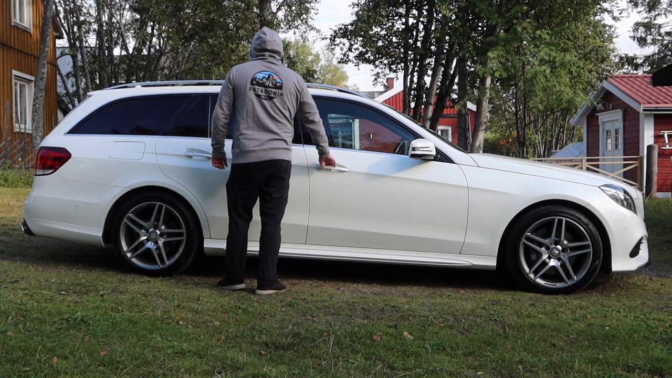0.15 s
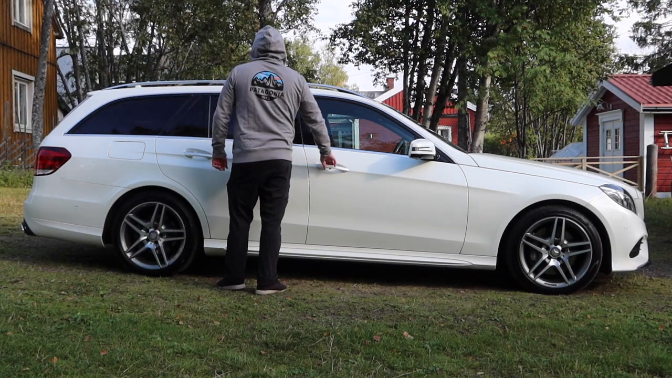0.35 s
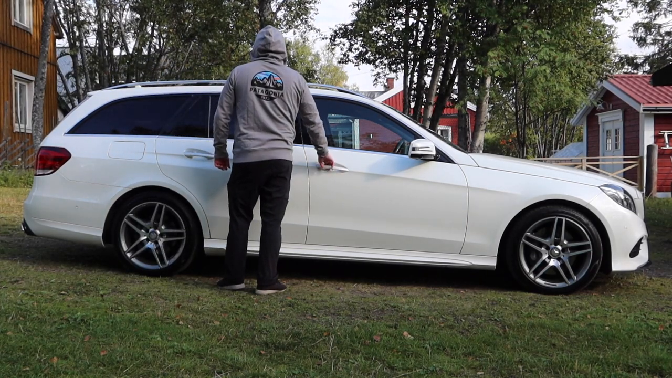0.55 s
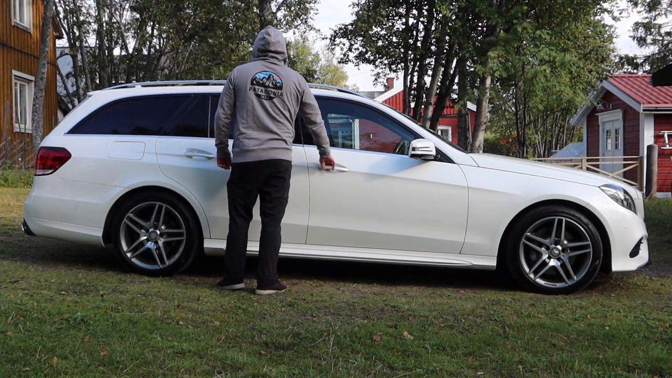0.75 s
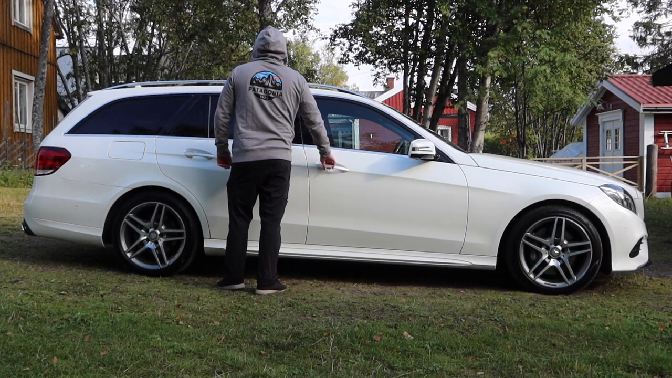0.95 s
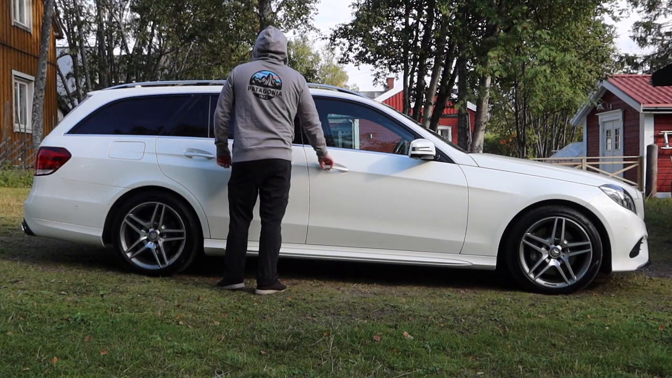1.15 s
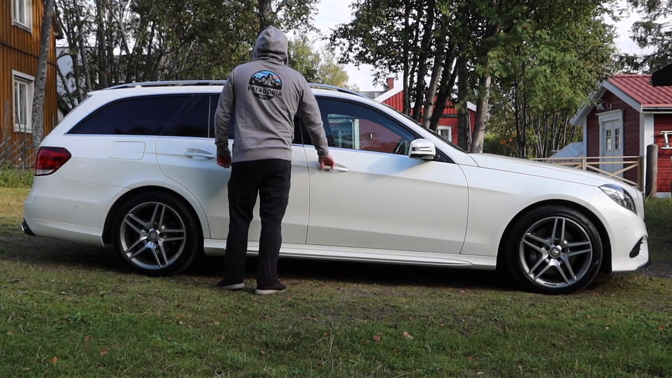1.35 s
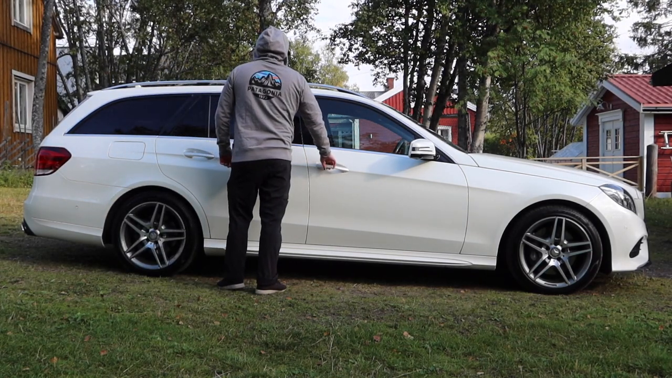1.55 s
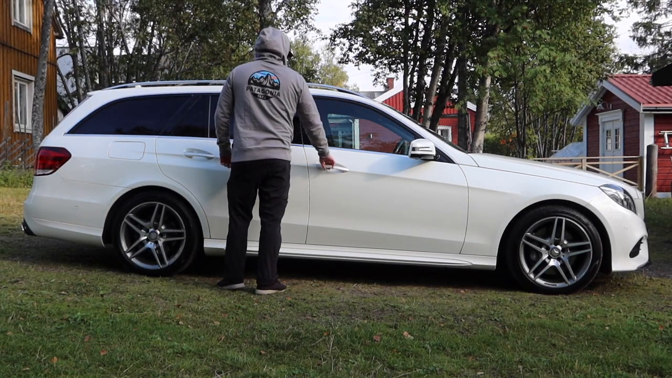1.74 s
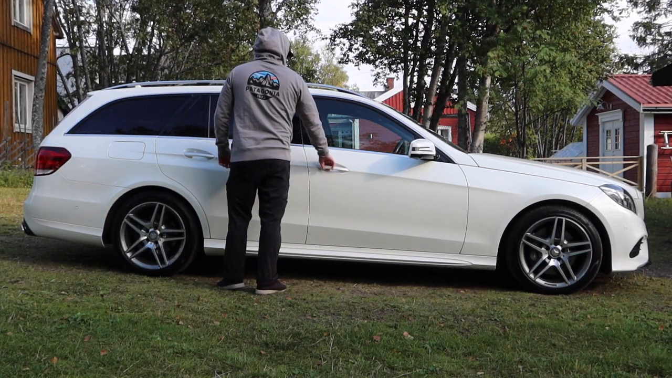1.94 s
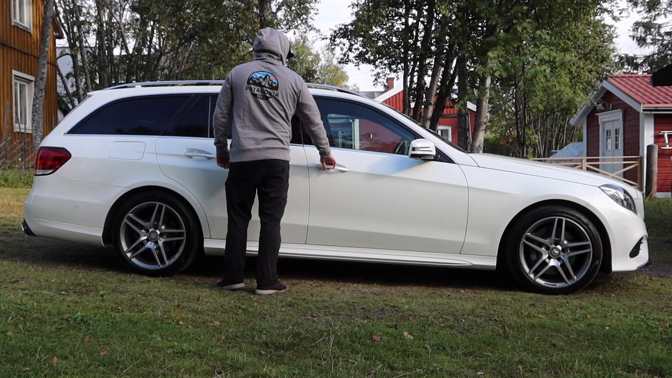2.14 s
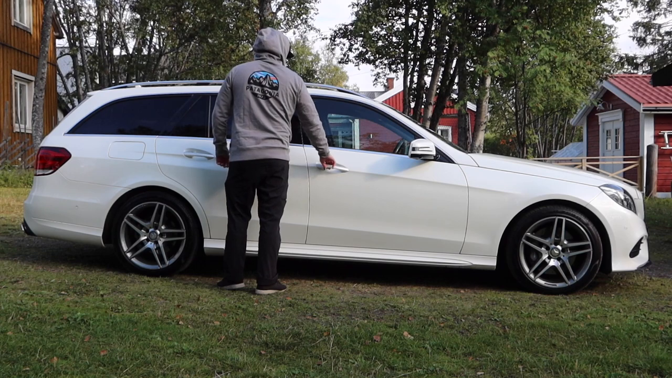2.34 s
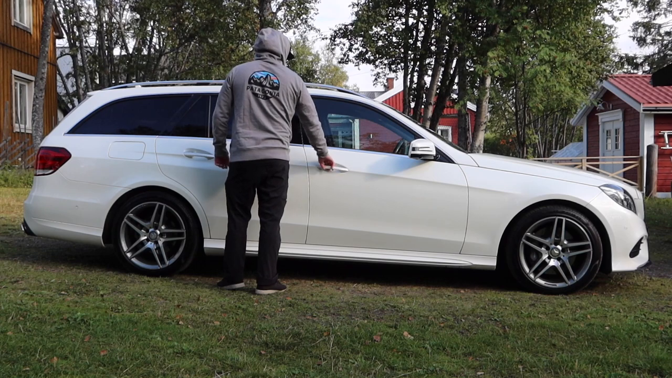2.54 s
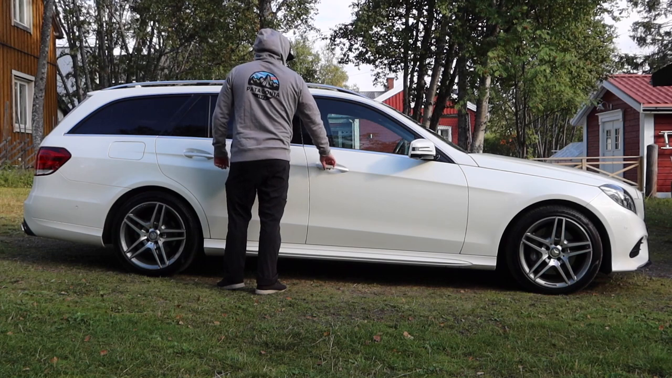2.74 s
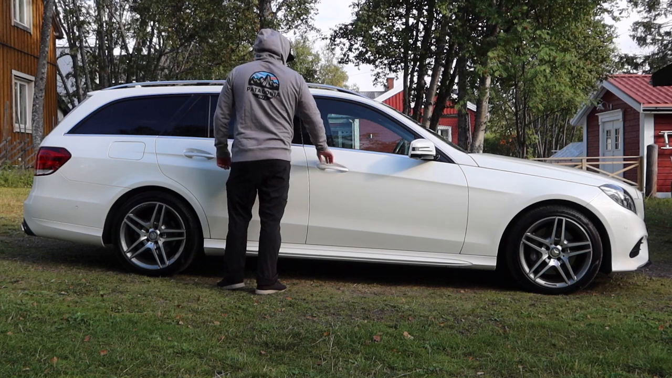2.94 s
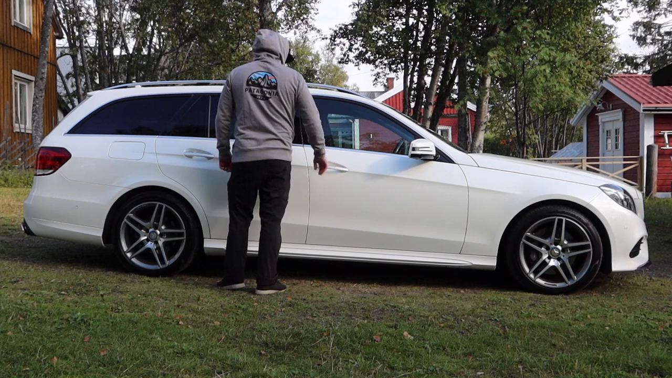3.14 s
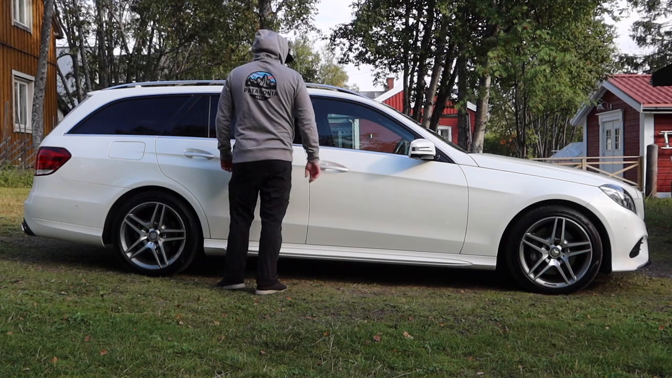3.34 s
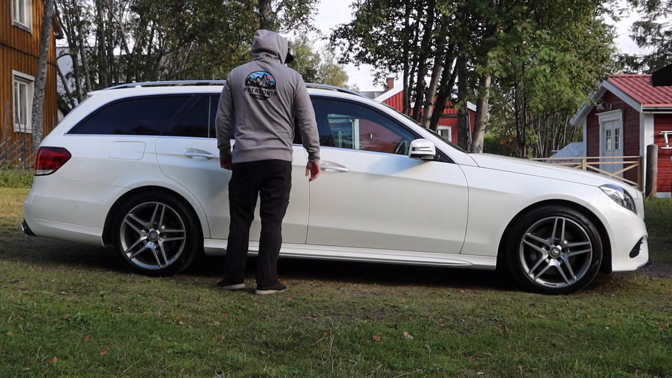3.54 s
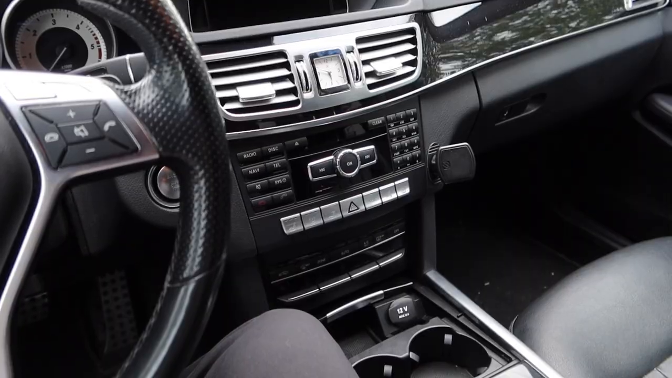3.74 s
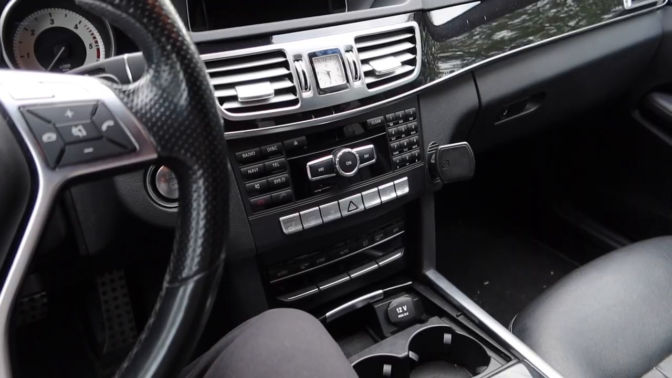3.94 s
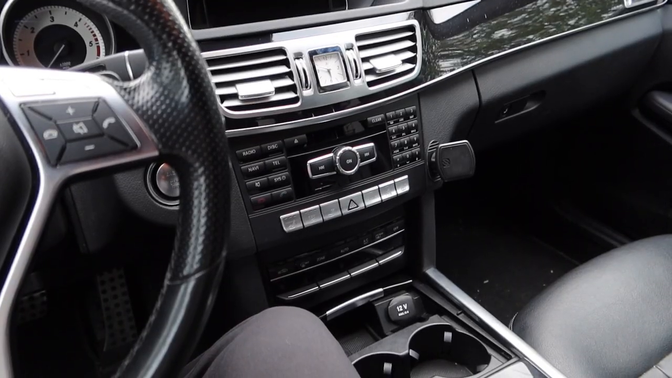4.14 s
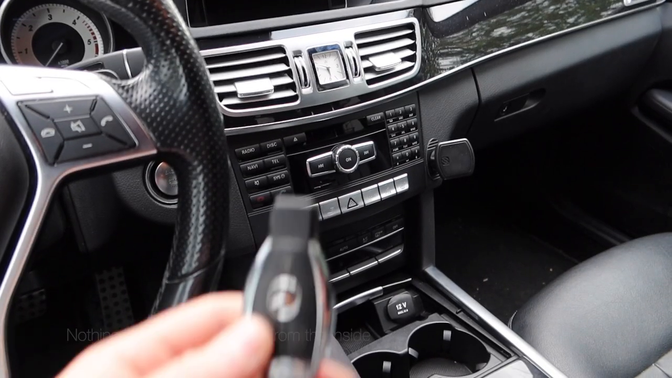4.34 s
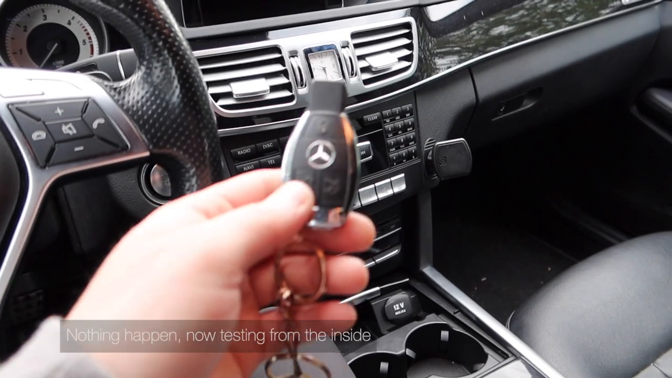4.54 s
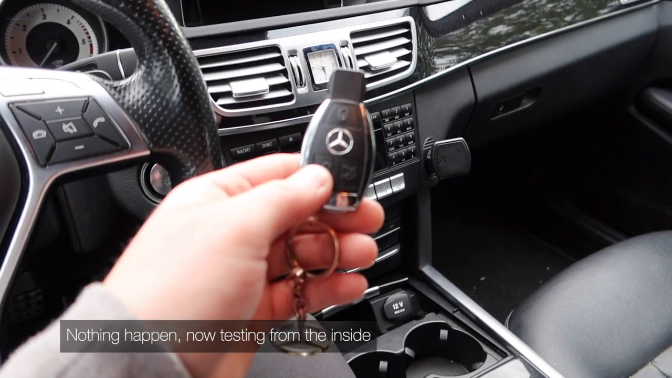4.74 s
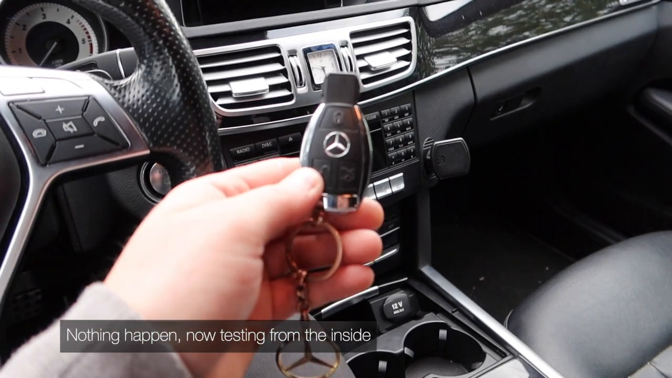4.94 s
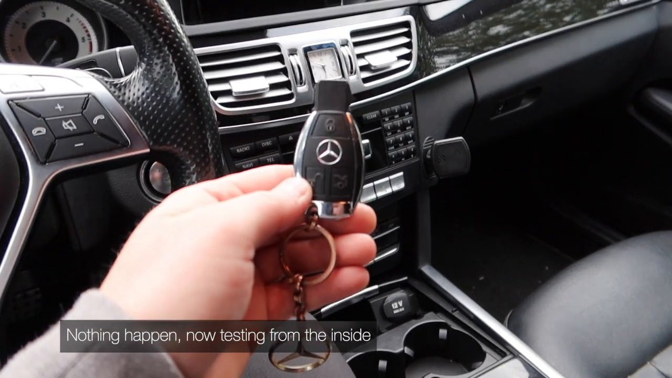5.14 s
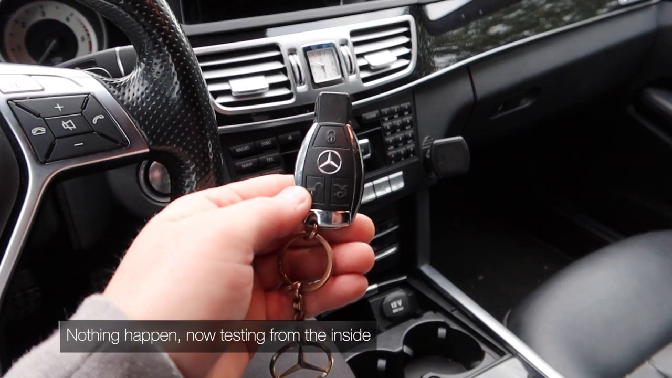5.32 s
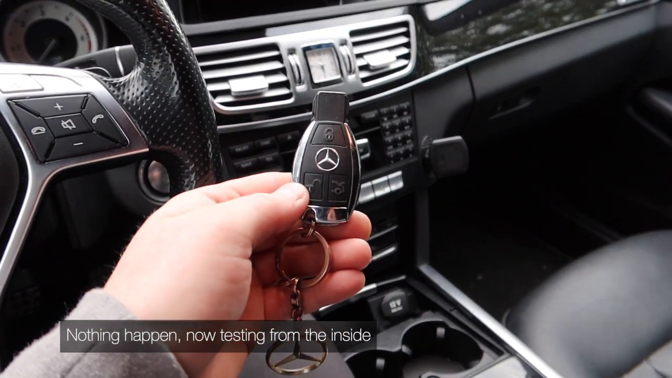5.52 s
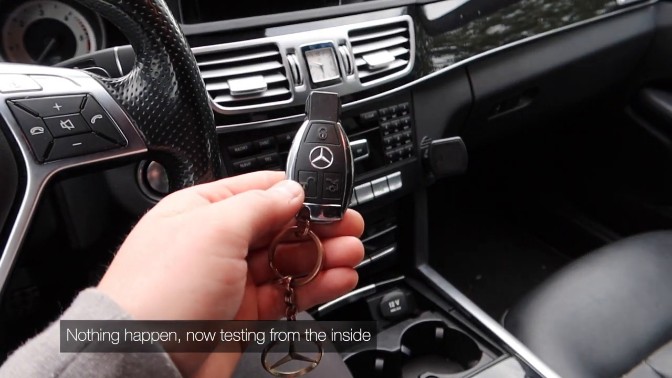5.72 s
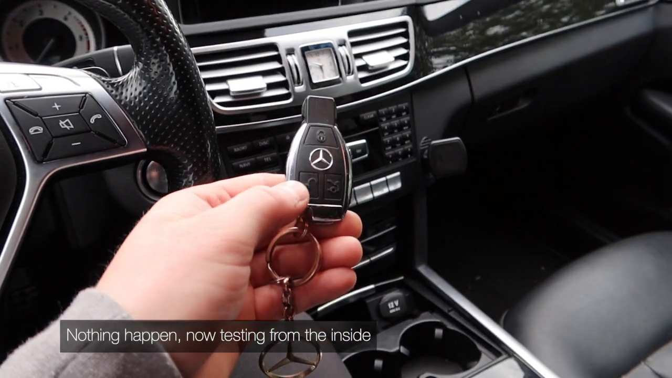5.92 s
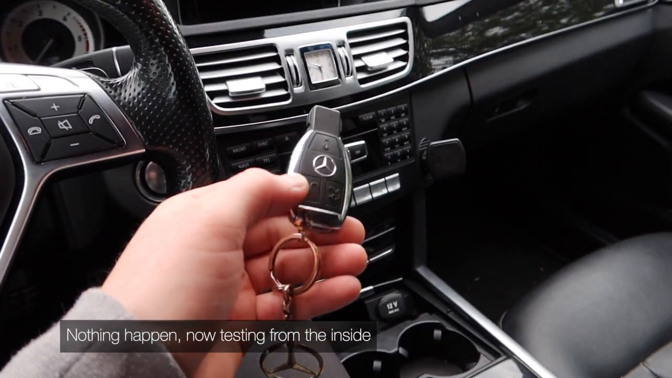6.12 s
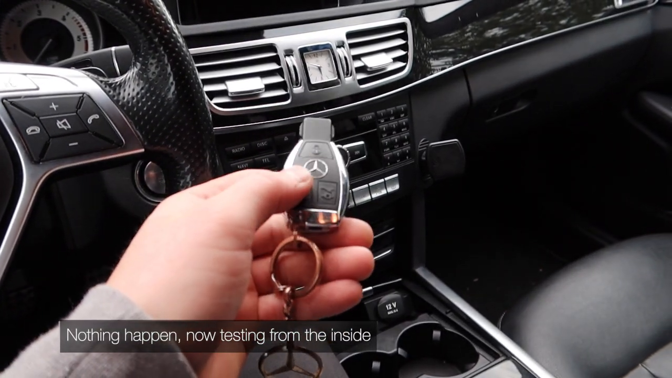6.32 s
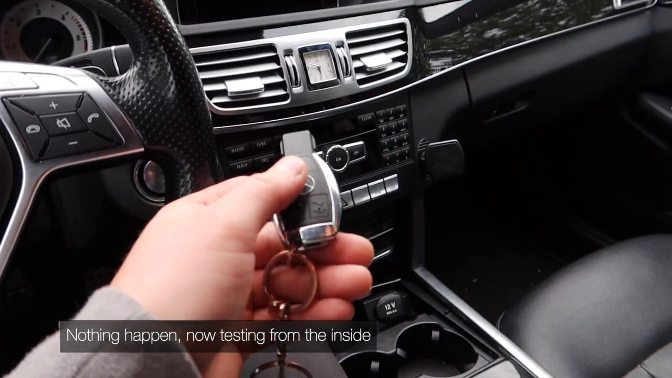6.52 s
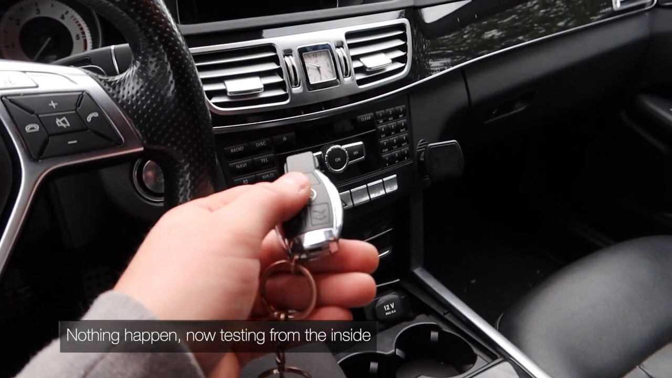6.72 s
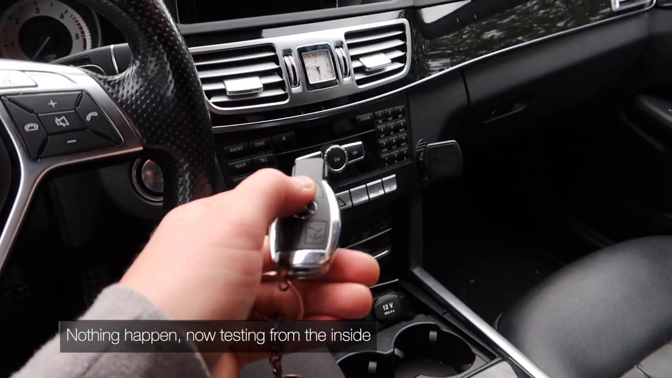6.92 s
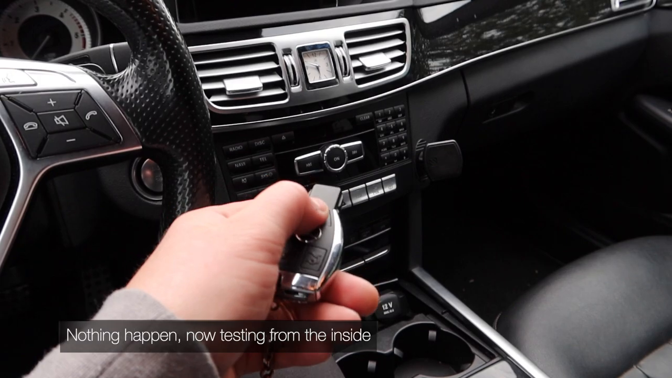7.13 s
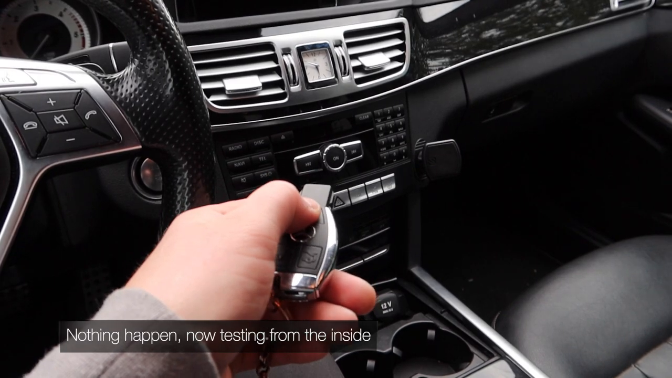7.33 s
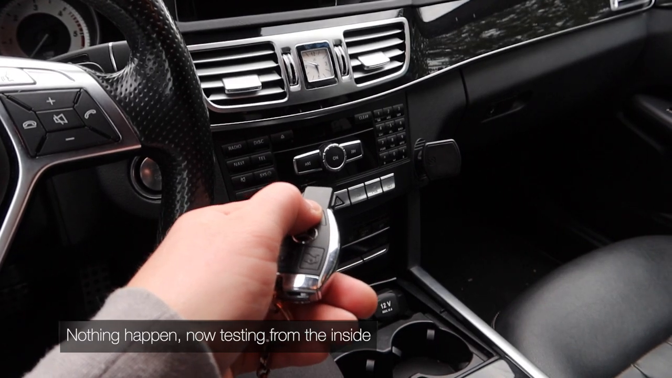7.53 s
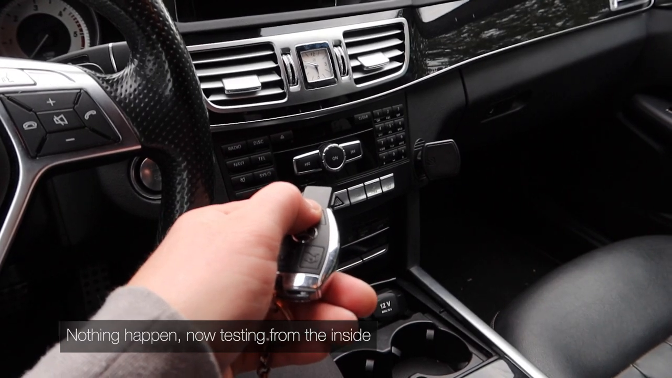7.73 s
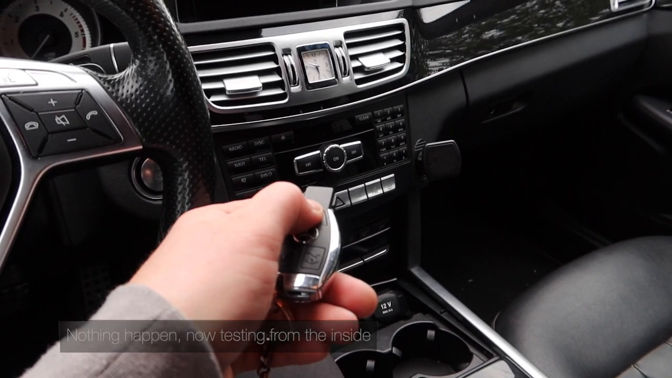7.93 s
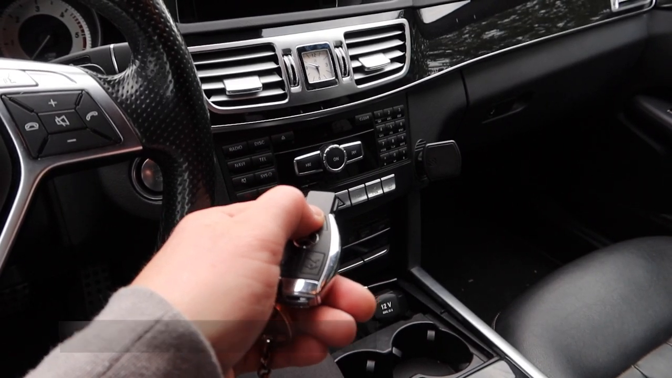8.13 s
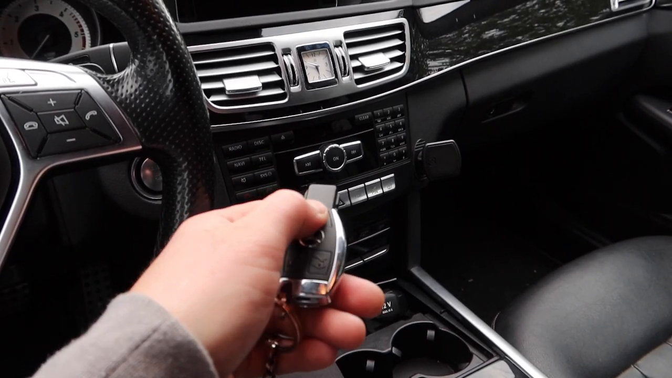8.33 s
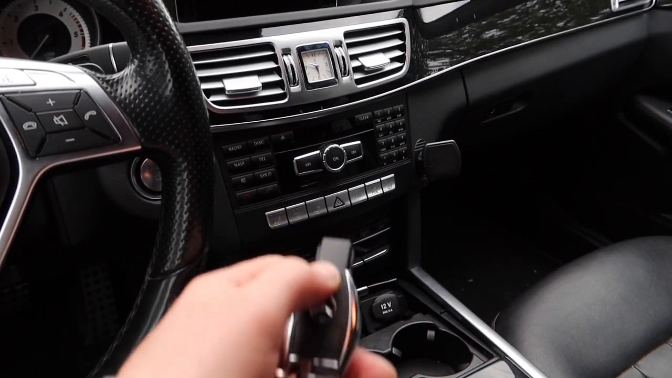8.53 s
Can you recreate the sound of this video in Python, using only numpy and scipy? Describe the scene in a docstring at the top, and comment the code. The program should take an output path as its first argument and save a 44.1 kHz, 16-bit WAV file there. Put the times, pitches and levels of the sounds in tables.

```python
"""Outdoors beside a locked car, the door handle is yanked and let go again and again while thrushes chatter in trees;
then, inside the cabin, cloth rustles, keys jingle, a far engine hums, a fob button clicks and door locks work.
The door is a bank of decaying modes struck by noise bursts; the birds are gliding sines, the air coloured noise.
Keys are noise cracks through resonances with a sine-mode ring; rubbing is grainy noise under bell-shaped swells.
The engine is two gliding sines; the locks are a sine whirr, noise rattle and rumble, and short low pulses."""
import sys
import numpy as np
from scipy import signal
from scipy.fft import rfft, irfft, next_fast_len
from scipy.io import wavfile
from scipy.ndimage import uniform_filter1d, map_coordinates

SR = 44100
rng = np.random.default_rng(int(sys.argv[2]) if len(sys.argv) > 2 else 0)


def inscribe(sig):
    """Save sig as 16-bit PCM at rate SR to the path in sys.argv[1].

    A 1-D sig is mono; a 2-D sig holds one channel per row.
    Samples are clipped to [-1, 1] before scaling.
    """
    pcm = np.round(np.clip(np.atleast_2d(sig).T, -1, 1) * 32767)
    wavfile.write(sys.argv[1], SR, pcm.astype(np.int16))


N = 377937  # samples
CABIN_START_S = 3.612  # the yard gives way to the cabin


def amp(db):
    """Decibel law: the amplitude gain of a level in dB."""
    return 10 ** (np.asarray(db) / 20)


def unit(x):
    """Power normalisation: x scaled to rms 1."""
    return x / np.sqrt(np.mean(x ** 2) + 1e-20)


def along(points, hz):
    """Logarithmic frequency scale: interpolate (frequency_hz, value) points along it."""
    point_hz, value = np.transpose(points)
    return np.interp(np.log(hz + 1), np.log(point_hz + 1), value)


def curves(rows):
    """Linear interpolation in time: one value per sample for each column after the time."""
    s, *columns = np.transpose(rows)
    return [np.interp(np.arange(N) / SR, s, column) for column in columns]


def wobble(rate):
    """Band-limited fluctuation: a smooth curve through `rate` random knots a second."""
    knots = rng.standard_normal(int(N * rate / SR) + 4)
    return map_coordinates(knots, [np.arange(N) * rate / SR])


def filtered(x, response):
    """Linear filtering: the spectrum of x times a complex response of frequency."""
    size = next_fast_len(len(x) + 8192)
    return irfft(rfft(x, size) * response(np.fft.rfftfreq(size, 1 / SR)), size)[:len(x)]


def noise(spectrum):
    """Spectral shaping: white noise coloured by (frequency_hz, level_db) points, at rms 1."""
    return unit(filtered(rng.standard_normal(N), lambda hz: amp(along(spectrum, hz))))


def burst(spectrum, t60s, size=8192):
    """Frequency-dependent damping: a noise puff of peak 1 whose bands die at their own speeds."""
    hz, t, bands = signal.stft(rng.standard_normal(size), SR, nperseg=64)
    decay = amp(-60 * t / along(t60s, hz)[:, None])
    puff = signal.istft(bands * decay, SR, nperseg=64)[1][:size]
    puff[0] += 4  # the contact itself
    # a folded cepstrum gives a minimum-phase filter: nothing sounds before the blow
    level_db = np.maximum(along(spectrum, np.fft.rfftfreq(2048, 1 / SR)), -80)
    cepstrum = np.fft.irfft(np.log(amp(level_db)))
    cepstrum[1:1024] *= 2
    cepstrum[1025:] = 0
    puff = signal.fftconvolve(puff, irfft(np.exp(rfft(cepstrum))))[:size]
    return puff / np.abs(puff).max()


def add(track, s, sound):
    """Superposition: mix a sound into the track at s seconds."""
    part = track[round(s * SR):][:len(sound)]
    part += sound[:len(part)]


def swells(rows):
    """Gaussian envelopes: bell-shaped swells from (middle_s, length_s, level_db) rows."""
    out = np.zeros(N)
    for s, length, db in rows:
        t = np.arange(-length * SR, length * SR) / SR
        add(out, s - length, amp(db) * np.exp(-(t / (0.37 * length)) ** 2))
    return out


# colour of leaves and far traffic: [frequency_hz, relative_level_db]
YARD_SPECTRUM = [(12, -41.5), (20, -6), (117, 3.5), (289, -2.5), (583, -6.5), (816, -6), (2180, -13.5),
                 (3330, -13), (4660, -26), (10500, -33), (15200, -39.5), (16500, -57.5)]
YARD_DB = -45.5


def yard():
    """Broadband ambience: leaves and far traffic merge into coloured noise of drifting level."""
    return amp(YARD_DB + 0.99 * wobble(5.11)) * noise(YARD_SPECTRUM)


# level of the far chatter: [time_s, level_db]
CHATTER_LEVEL = [(0, -57), (.5, -56.5), (.75, -51), (1.2, -58), (1.6, -54), (2.1, -55.5), (2.5, -55),
                 (2.8, -48), (3.61, -54)]
# harsh calls of a nearer bird: [middle_s, level_db]
HARSH_CALLS = [(2.378, -53), (2.67, -48.5), (2.79, -51), (2.93, -54), (3.03, -55), (3.125, -45.5),
               (3.225, -45), (3.325, -41.5), (3.445, -42.5), (3.57, -44)]
# single clear notes: [start_s, length_s, first_pitch_hz, last_pitch_hz, level_db]
WHISTLES = [(0.024, .06, 4350, 4960, -55), (.565, 0.073, 2880, 2620, -49.5), (.69, 0.046, 2950, 3230, -46),
            (.735, 0.068, 3260, 3490, -43.5), (0.812, .035, 3500, 3900, -45), (.835, .035, 3050, 2700, -47),
            (.85, .015, 4000, 4300, -49), (0.994, 0.024, 3010, 2700, -48), (1.008, 0.012, 4220, 4000, -50),
            (1.549, 0.11, 3590, 4130, -53), (1.93, .08, 3300, 3600, -50), (2.33, .07, 3100, 3300, -50)]


def thrushes():
    """Frequency and amplitude modulation: falling buzzy notes overlap; calls and whistles stand out."""
    birds, t = np.zeros(N), np.arange(800) / SR
    for s, pitch, high, fall, size, buzz in rng.random((2200, 6)):
        start_hz = 2480 + 800 * (pitch + buzz) + 4600 * high ** 3  # a few notes are shrill
        hz = start_hz * (1 - (.05 + .25 * fall) * t / t[-1])
        buzzing = 1 + .8 * np.sin(2 * np.pi * (130 + 80 * buzz) * t)
        shape = np.sin(np.pi * t / t[-1]) * buzzing
        note = shape * np.sin(2 * np.pi * np.cumsum(hz) / SR)
        add(birds, s * CABIN_START_S, amp(6 * size - 24 * high ** 2) * note)
    # dividing by the local loudness keeps the chatter from pausing
    birds = birds / np.sqrt(np.abs(uniform_filter1d(birds ** 2, size=2500)) + 1e-3)
    calls = swells([(s, .087, db) for s, db in HARSH_CALLS])
    birds = birds * (amp(curves(CHATTER_LEVEL)[0]) + calls)
    for s, length, first_hz, last_hz, db in WHISTLES:
        u = np.linspace(0, 1, round(length * SR))
        hz = first_hz + (last_hz - first_hz) * u
        add(birds, s, amp(db) * np.sin(np.pi * u) * np.sin(2 * np.pi * np.cumsum(hz) / SR))
    echo = burst([(100, 0), (16000, 0.0031)], [(2000, 0.55), (8000, 0.1)])
    return birds + amp(-6) * signal.fftconvolve(birds, echo / np.linalg.norm(echo))[:N]


# the handle hits its end stop: [start_s, click_db]
PULLS = [(0.2083, -9.5), (0.5087, -13.5), (0.8063, -7), (1.0954, -14), (1.3807, -8), (1.6706, -10.5),
         (1.953, -12), (2.2387, -10.5), (2.5351, -16.5)]
# the handle springs back onto the door: [start_s, click_db]
RELEASES = [(0.0209, -24), (0.6728, -15), (0.9702, -22), (1.255, -15), (1.5466, -23), (2.098, -19.5),
            (2.397, -20), (2.6875, -9), (2.8624, -19)]
# the slack linkage ticks between the blows: [start_s, click_db]
LINKAGE_TICKS = [(0.182, -34), (0.3092, -26.5), (0.4795, -31), (0.611, -28.5), (0.7839, -36), (0.9009, -26),
                 (1.071, -31.5), (1.1951, -25.5), (1.4764, -24), (1.7539, -22), (2.0311, -23.5),
                 (2.2086, -36), (2.3326, -25.5), (2.6359, -22.5), (2.853, -22.5)]
# modes of the door: [pitch_hz, pulled_level_db, released_level_db, t60_s]
DOOR_MODES = [(87.4, -9, -21, 0.37), (122.3, 0, -2, .3), (138, 1, 0.5, 0.23), (184, 0.5, 1.5, 0.22),
              (238.9, -4.5, -5.5, 0.27), (270, -12, -6, 0.14), (351, -10.5, -8, 0.29),
              (377.6, -10.5, -3, 0.17), (449.5, -12.5, -9.5, .16), (515.6, -1, -2.5, .14),
              (573, -1.5, -3.5, 0.17), (645, -3, -5, 0.128), (729, -10, 1.5, 0.071), (772.2, -1, -2.5, .13),
              (1050, -12.5, -24, 0.071), (1110, -25, -13, 0.033), (1570, -8.5, -7, 0.071),
              (2450, -15, -13, 0.066)]
# colour of a handle blow: [frequency_hz, relative_level_db], and its decay: [frequency_hz, t60_s]
CLACK_SPECTRUM = [(350, -31.5), (600, -6.5), (801, 1), (970, -10.5), (1680, -8.5), (2070, -17), (3080, -18),
                  (3340, -15.5), (4650, -30), (13000, -51.5), (16000, -65)]
CLACK_T60 = [(700, 0.09), (1600, 0.039), (4000, 0.031), (12000, 0.0185)]
# colour of a linkage tick: [frequency_hz, relative_level_db], and its decay: [frequency_hz, t60_s]
TICK_SPECTRUM = [(700, 2.5), (2600, 3.5), (7500, -14), (16000, -42)]
TICK_T60 = [(700, .06), (2600, 0.072), (9000, 0.033)]
# colour of the loose trim after a blow: [frequency_hz, relative_level_db]
SHUDDER_SPECTRUM = [(60, -28), (120, 0.5), (300, -2.5), (800, -18.5), (1500, -37), (3000, -57.5)]
# how hard the door rings: usual_click_db, skin_db and bracket_db at that click,
# then the growth of skin and of bracket in dB per dB of click
PULL_LAW = (-11, -22, -24.5, .4, -.1)
RELEASE_LAW = (-18, -23, -30, .75, .4)
TICK_LAW = (-27, -38.5, -38.6, .4, .41)
BRACKET_HZ = 480  # skin modes lie below, handle bracket modes above
BOUNCE_S, BOUNCE_DB = .009, -14  # delay after the blow, level against the click
SHUDDER_DB = -2.1  # against the door skin


def door():
    """Modal synthesis: each blow clacks, rings the door skin and handle bracket, and shakes the trim."""
    out, shake, t = np.zeros(N), np.zeros(N), np.arange(SR // 3) / SR
    hz, pulled_db, released_db, t60 = np.transpose(DOOR_MODES)[:, :, None]
    is_skin = hz < BRACKET_HZ
    # neighbouring skin modes start in opposite senses and beat; bracket modes start together with a snap
    sign = np.where(is_skin, (-1.) ** np.arange(len(DOOR_MODES))[:, None], 1)
    ring = sign * amp(-60 * t / t60) * np.sin(2 * np.pi * hz * t)
    swell = 1 - np.exp(-t * hz / 0.4)  # low modes take about a cycle to build up
    kinds = ((PULLS, PULL_LAW, pulled_db, CLACK_SPECTRUM, CLACK_T60),
             (RELEASES, RELEASE_LAW, released_db, CLACK_SPECTRUM, CLACK_T60),
             (LINKAGE_TICKS, TICK_LAW, pulled_db, TICK_SPECTRUM, TICK_T60))
    for blows, law, mode_db, spectrum, decay in kinds:
        usual_db, usual_skin_db, usual_bracket_db, skin_grows, bracket_grows = law
        for s, click_db in blows:
            skin_db = usual_skin_db + skin_grows * (click_db - usual_db)
            bracket_db = usual_bracket_db + bracket_grows * (click_db - usual_db)
            level_db = np.where(is_skin, skin_db, bracket_db) + mode_db
            mode_gain = amp(level_db + rng.normal(0, 1.7, hz.shape))
            add(out, s, (mode_gain * ring * swell).sum(0))
            add(out, s, amp(click_db) * burst(spectrum, decay))
            add(shake, s, amp(skin_db + SHUDDER_DB - 60 * t / 0.32) * (1 - np.exp(-t / 0.0034)))
    for s, click_db in PULLS:  # the handle bounces once on its stop
        add(out, s + BOUNCE_S, amp(click_db + BOUNCE_DB) * burst(TICK_SPECTRUM, CLACK_T60))
    return out + shake * noise(SHUDDER_SPECTRUM)


# colour of the cabin hush: [frequency_hz, relative_level_db]
CABIN_SPECTRUM = [(20, 1.5), (40, -3.5), (60, -9.5), (130, -15.5), (220, -17.5), (500, -26.5), (1000, -30),
                  (2600, -35.5), (15200, -44), (16500, -56)]
CABIN_DB = -49.8
# decay of sound in the cabin: [frequency_hz, t60_s]
CABIN_T60 = [(300, 0.072), (2000, 0.057), (6000, 0.068), (15000, 0.05)]
# the far engine pulls in surges: [start_s, end_s, first_pitch_hz, last_pitch_hz, level_db]
ENGINE_SURGES = [(5.4, 6.36, 113.5, 115.5, -53), (6.45, 7.15, 115, 127, -55), (7.2, 8.45, 126, 140, -54.5)]
SURGE_FADE_S = .12
# a knee meets the trim: [start_s, level_db]
KNEE_KNOCKS = [(3.898, -37)]


def cabin_air():
    """Tones over a noise floor: the cabin hush, a far engine speeding up in surges, a knock on the trim."""
    t = np.arange(N) / SR
    start, end, first_hz, last_hz, db = np.transpose(ENGINE_SURGES)
    k = np.maximum(np.searchsorted(start, t) - 1, 0)  # the surge under way
    hz = first_hz[k] + (last_hz - first_hz)[k] * (t - start[k]) / (end - start)[k]
    phase = 2 * np.pi * np.cumsum(hz * (1 + 0.01054 * wobble(4.5))) / SR
    fade = np.clip(np.minimum(t - start[k], end[k] - t) / SURGE_FADE_S, 0, 1)
    tones = np.sin(phase) + amp(-4.5) * np.sin(phase * 2 / 3)
    out = fade * amp(db[k] + 2.1 * wobble(7)) * tones
    t = np.arange(SR // 10) / SR
    for s, db in KNEE_KNOCKS:
        add(out, s, amp(db - 60 * t / .08) * np.sin(2 * np.pi * 110 * t))
        add(out, s, amp(db) * burst([(100, 6), (2200, 1), (9000, -41)], CABIN_T60))
    return out + amp(CABIN_DB + 0.8 * wobble(2.944)) * noise(CABIN_SPECTRUM)


# cloth and skin rubbing: [middle_s, length_s, level_db]
RUBS = [(3.638, 0.056, -52), (4.3, 1.5, -66), (4.111, 0.05, -51.5), (4.199, 0.11, -55.5),
        (4.46, 0.1, -55.5), (4.947, 0.036, -52), (6.055, 0.05, -52), (6.24, 0.045, -42), (6.693, 0.06, -58),
        (7.0, 0.07, -45), (7.1, .05, -54), (7.3, .04, -47)]
# colour of the rubbing: [frequency_hz, relative_level_db]
CLOTH_SPECTRUM = [(590, -10.5), (1000, -6.5), (1220, -17.5), (1800, -3.5), (2030, -2.5), (3220, 1),
                  (10200, -20), (14000, -23)]
SCUFF_T60_S, SCUFF_DB = .15, -31  # fingers drag on after a key knock: fade, level against the knock


def rustles():
    """Friction noise: swells of rubbing made grainy by a fast random level."""
    stroke, t = swells(RUBS), np.arange(SR // 5) / SR
    for s, db, _ in KEY_KNOCKS:
        add(stroke, s, amp(db + SCUFF_DB - 60 * t / SCUFF_T60_S))
    return stroke * unit(amp(2.5 * wobble(250)) * noise(CLOTH_SPECTRUM))


# keys knocking on the fob: [start_s, peak_db, treble_db]
KEY_KNOCKS = [(4.0004, -39.5, -31), (4.4968, -31.5, -4.5), (4.576, -26.5, -13), (4.9333, -40, -3),
              (6.0683, -18, 2.1), (6.2147, -22.5, 3), (6.2176, -14.5, 4), (6.237, -28, -2.1),
              (6.2637, -20, -11), (6.3092, -19, -3.5), (6.4141, -28.5, 0.1), (6.4378, -32, -12),
              (6.6051, -33.5, -13), (6.8983, -37.5, -5), (6.928, -27.5, 4.5), (6.981, -22, 1.1),
              (7.0184, -22, -6), (7.0372, -12.5, -5.5), (7.0654, -28.5, 6), (7.0895, -28.5, 5),
              (7.1704, -35, -6), (7.2604, -36.5, -4), (7.2959, -18, -1.5)]
# faint chance knocks, one row: start_s, end_s, peak_db, spread_db, treble_db
JIGGLE = (6.15, 7.3, -45, 3.5, -14)
# resonances of the plastic fob: [pitch_hz, width_hz, level_db]
FOB_RESONANCES = [(2020, 640, -0.5), (3400, 880, 0), (4300, 900, -3), (6070, 760, 0), (7620, 1800, -3),
                  (9620, 2300, -9), (12700, 3800, -21.5)]
# the steel key ring is struck: [start_s, level_db]
CHIMES = [(6.263, -32), (6.415, -30.5), (6.509, -50), (6.565, -51), (7.298, -30)]
# modes of the steel ring: [pitch_hz, relative_level_db, t60_s]
RING_MODES = [(7500, 0.5, 0.013), (9200, -8, 0.034), (13760, -15, 0.049)]


def keys():
    """Source and resonator: noise cracks excite the plastic fob; decaying modes chime in the steel ring."""
    out, t = np.zeros(N), np.arange(SR // 10) / SR
    start, end, faint_db, spread_db, faint_treble_db = JIGGLE
    faint = [(start + u * (end - start), faint_db + spread_db * (2 * v - 1), faint_treble_db)
             for u, v in rng.random((14, 2))]
    for s, db, treble_db in KEY_KNOCKS + faint:
        crack = rng.standard_normal(len(t)) * amp(-60 * t / 0.0098) * (1 - np.exp(-t / 0.00027))
        level_db = [g + (hz > 5000) * treble_db for hz, width, g in FOB_RESONANCES]
        gains = amp(rng.normal(0, 2.4, len(FOB_RESONANCES)) + level_db)  # each knock has its own colour

        def body(f):
            """Parallel resonances of alternating sign, high-passed: too small to radiate bass."""
            total = 0
            for k, (hz, width, _) in enumerate(FOB_RESONANCES):
                damping = 1j * f * width
                total = total + (-1) ** k * gains[k] * damping / (hz * hz - f * f + damping)
            return total * (1j * f / (1600 + 1j * f)) ** 2

        knock = filtered(crack, body)
        add(out, s, amp(db) * knock / np.abs(knock).max())
    for s, db in CHIMES:
        for hz, mode_db, t60 in RING_MODES:
            level_db = db + mode_db + rng.normal(0, 1.9)
            add(out, s, amp(level_db - 60 * t / t60) * np.sin(2 * np.pi * hz * t))
    return out


# the fob button goes down and up: [start_s, peak_db]
BUTTON_CLICKS = [(8.1417, -5), (8.3224, -3)]
# colour of the snapping dome: [frequency_hz, relative_level_db]
SNAP_SPECTRUM = [(150, -28), (500, -21.5), (1200, -15.5), (2100, -4), (3400, -4.5), (4500, -8.5),
                 (5700, -9), (7300, -13), (8700, -11.5), (10800, -17), (12200, -13), (13600, -18),
                 (16500, -27)]


def button():
    """Snap-through buckling: the metal dome under the fob button snaps in short, damped bursts."""
    out = np.zeros(N)
    for s, db in BUTTON_CLICKS:
        add(out, s, amp(db) * burst(SNAP_SPECTRUM, [(500, 0.022), (3000, 0.0068), (14000, 0.0032)]))
    return out


# lock motor start-up, one row: start_s, peak_s, end_s, pitch_hz, peak_db
WHIRR = (8.407, 8.419, 8.428, 487, -9.5)
# the lock gear rattles, one row: peak_s, level_db, rise_db_per_s, fall_db_per_s_squared, run_on_db
GEAR_RATTLE = (8.452, -16.8, 750, 11500, -52)
# the lock housing rumbles, one row: full_s, stop_s, level_db, rise_db_per_s, fall_db_per_s, run_on_db
HOUSING_RUMBLE = (8.436, 8.48, -18, 700, 480, -39)
# colours of rattle and of rumble: [frequency_hz, relative_level_db]
RATTLE_SPECTRUM = [(530, -31), (900, -2), (1550, -1), (2470, -7.5), (3550, -1), (4460, -14), (5350, -18.5),
                   (16000, -52)]
RUMBLE_SPECTRUM = [(40, -33), (80, -5), (200, -3.5), (550, -3), (900, -14.5), (1600, -32), (3300, -90)]
# bolts landing, then two low thumps of the housing as the rumble dies away: [middle_s, peak_db, pitch_hz]
LOCK_THUMPS = [(8.4642, -7.5, 320), (8.4677, -6.5, 340), (8.4782, -9, 230), (8.501, -20, 170),
               (8.553, -26, 90)]


def locks():
    """Machine noise: a brief motor tone, gear and housing noise, pulses for bolts and housing thumps."""
    t = np.arange(N) / SR
    start, peak, end, hz, db = WHIRR
    spin_up = np.interp(t, [start, start + 0.00312, peak, end], [0, 0.4, 1, 0])
    whirr = amp(db) * spin_up * np.sin(2 * np.pi * hz * (t - start))
    top, db, rise, fall, run_on_db = GEAR_RATTLE
    rattle = amp(db - rise * np.maximum(top - t, 0) - fall * np.maximum(t - top, 0) ** 2)
    rattle = rattle + amp(run_on_db) * (t > top)
    full, stop, db, rise, fall, run_on_db = HOUSING_RUMBLE
    rumble = amp(db - rise * np.maximum(full - t, 0) - fall * np.maximum(t - stop, 0))
    rumble = rumble + amp(run_on_db) * (t > stop)
    gear = rattle * amp(2.2 * wobble(300)) * noise(RATTLE_SPECTRUM)
    housing = rumble * noise(RUMBLE_SPECTRUM)
    out = whirr + np.clip((t - start) / .003, 0, 1) * (gear + housing)
    t = np.arange(-800, 800) / SR
    for s, peak_db, pulse_hz in LOCK_THUMPS:
        pulse = np.cos(2 * np.pi * pulse_hz * t) * np.exp(-(t * pulse_hz * 2.4) ** 2)
        add(out, s + t[0], amp(peak_db) * pulse)
    return out


def scene():
    """Superposition and reverberation: yard first, cabin after, with a short echo on keys and button."""
    outside = uniform_filter1d(1. * (np.arange(N) < CABIN_START_S * SR), size=400)
    close = keys() + button()
    echo = burst([(100, 5.5), (2000, -4), (4000, 0), (16000, -7.5)], CABIN_T60)
    wet = signal.fftconvolve(close, echo / np.linalg.norm(echo))[:N]
    inside = close + amp(-5) * wet + rustles() + locks() + cabin_air()
    return (outside * (yard() + thrushes() + door()) + (1 - outside) * inside)[None]


TOP_HZ = 16300


def record(dry):
    """Low-pass filtering: a very steep slope removes the treble above the band limit."""
    return filtered(dry[0], lambda hz: 1 / (1 + (hz / TOP_HZ) ** 80))[None]


dry = scene()
out = record(dry)
inscribe(out)
```